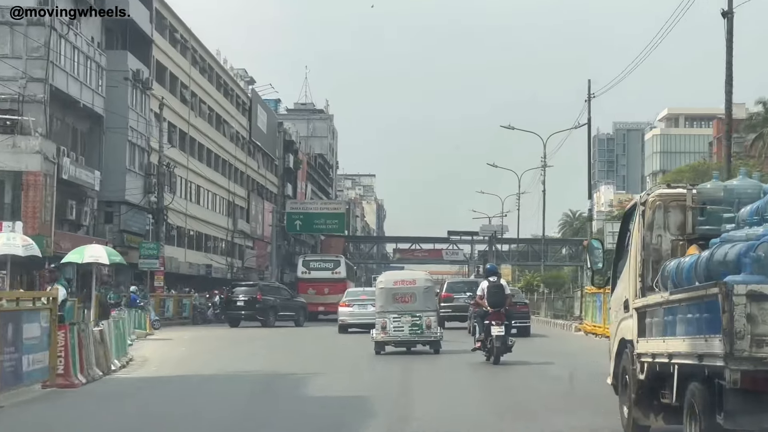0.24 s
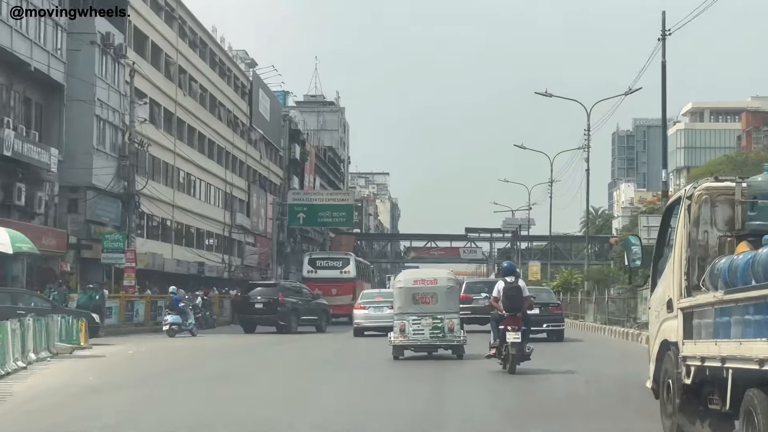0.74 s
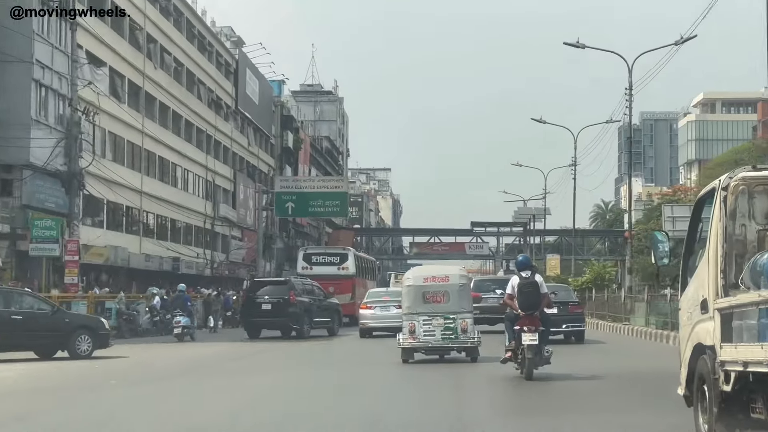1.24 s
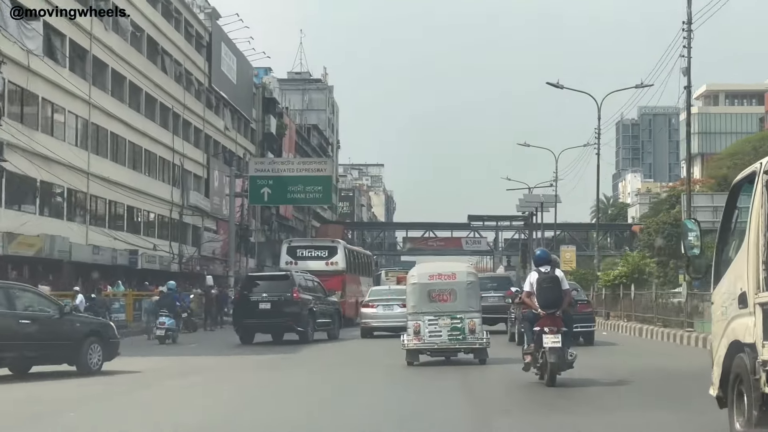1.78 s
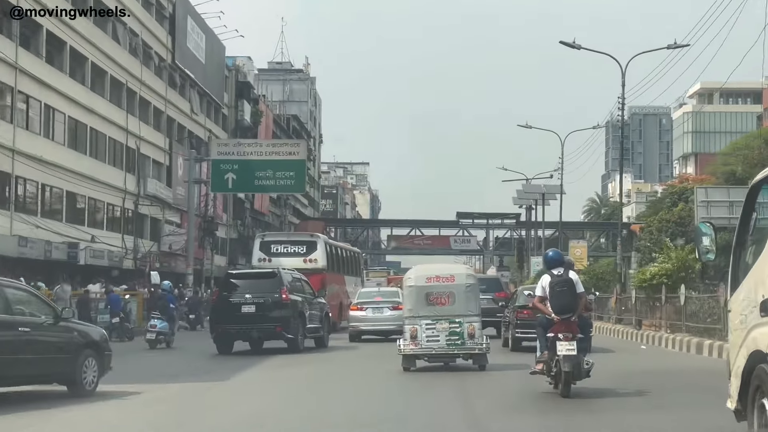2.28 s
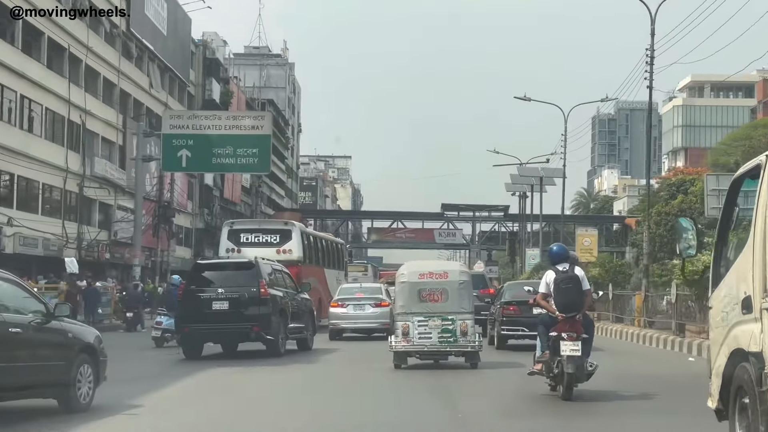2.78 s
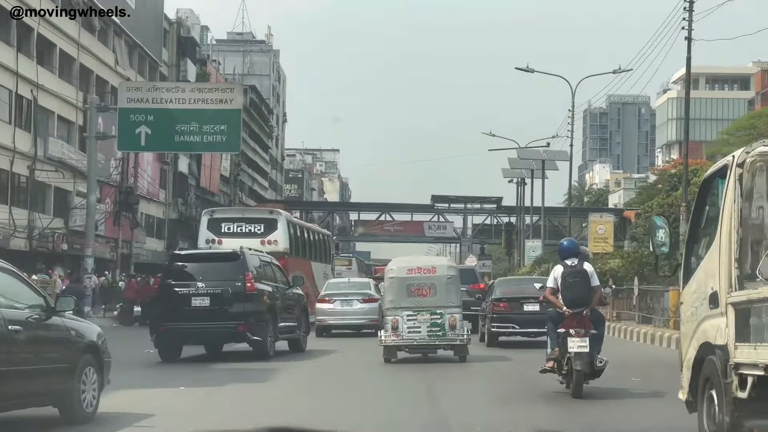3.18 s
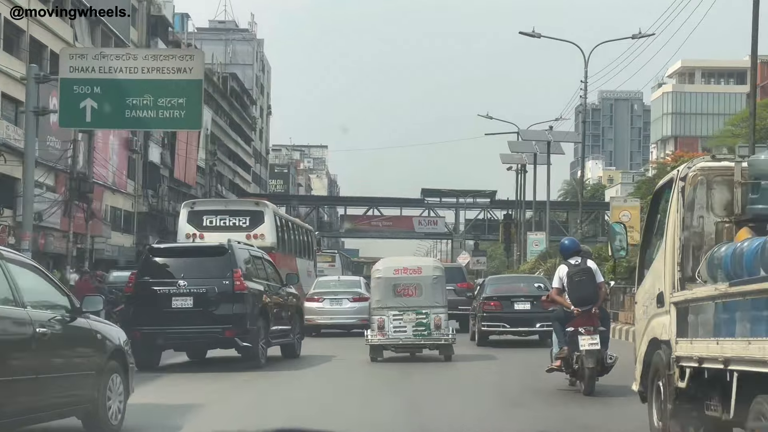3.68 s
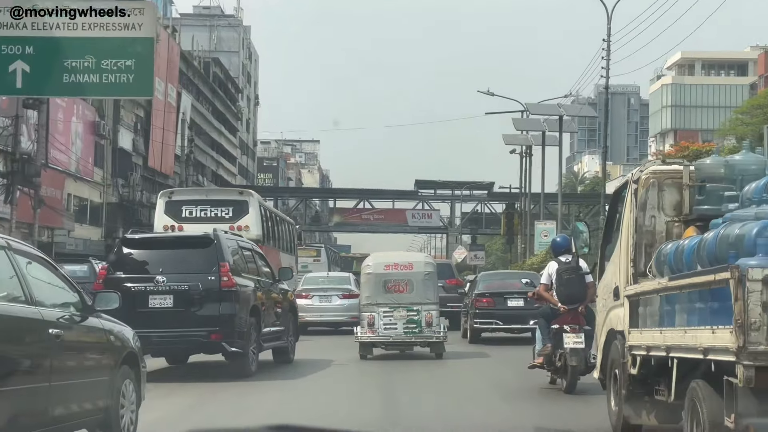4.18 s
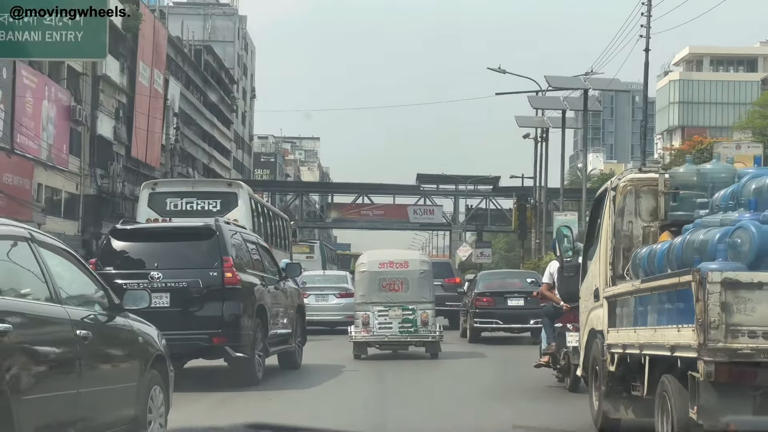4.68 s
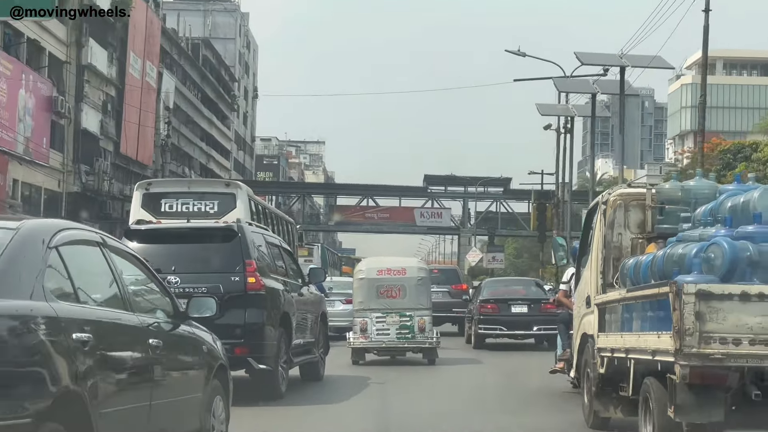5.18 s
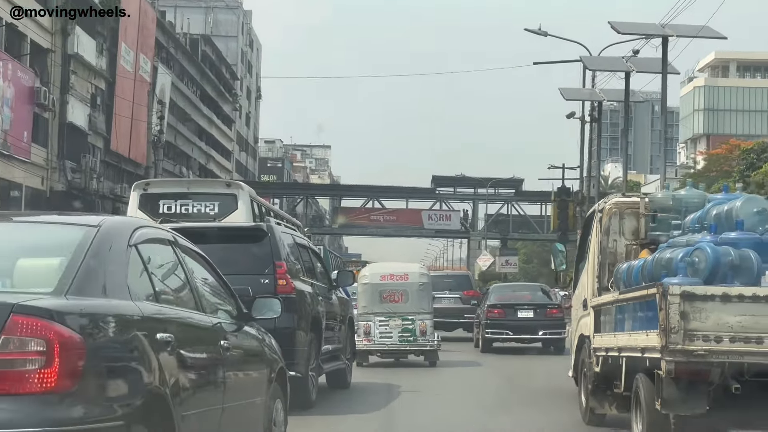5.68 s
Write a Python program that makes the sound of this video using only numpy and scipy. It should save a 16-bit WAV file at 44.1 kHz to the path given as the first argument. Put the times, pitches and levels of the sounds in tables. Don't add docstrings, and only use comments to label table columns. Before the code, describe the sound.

Strong wind buffets a microphone with heavy low thumps and pops, easing to a softer rumble, over faint fan hiss and barely audible distant horns.

```python
import sys
import numpy as np
from scipy import signal
from scipy.fft import rfft, irfft
from scipy.io import wavfile
from scipy.ndimage import uniform_filter1d, minimum_filter1d

SR = 44100
rng = np.random.default_rng(int(sys.argv[2]) if len(sys.argv) > 2 else 0)


def linear_from_db(decibels):
    return 10 ** (np.asarray(decibels, float) / 20)


def waveform_to_disk(signal):
    frames = np.transpose(np.atleast_2d(signal))
    scaled = np.clip(frames, -1, 1) * 32767
    samples = np.round(scaled).astype(np.int16)
    wavfile.write(sys.argv[1], SR, samples)


N = 261954

# time in seconds, strength in dB.
FLOW_DB = [(0, -24.5), (.38, -24), (.66, -25.5), (1.1, -25.5), (1.4, -23.5), (1.65, -23.5), (1.85, -25.5),
           (2.0, -22.5), (2.25, -35.5), (2.45, -27.5), (2.8, -31), (3.44, -34), (3.68, -34), (4.3, -32.5),
           (5.09, -36.5), (5.5, -34), (5.72, -44.5), (5.94, -36.5)]
USUAL_FLOW_DB = -30
# frequency in Hz, level in dB per Hz.
RUMBLE_DB = [(20, -54), (45, -5), (80, 1), (96, 10.5), (125, -3), (170, -29.5), (400, -110)]


def evened(x):
    return x / np.sqrt(np.mean(x ** 2) + 1e-20)


def read(points, hz, axis=1):
    columns = np.transpose(points)
    return np.interp(np.log(hz + 1), np.log(columns[0] + 1), columns[axis])


def coloured(x, points):
    hz = np.fft.rfftfreq(x.shape[-1], 1 / SR)
    return irfft(rfft(x) * linear_from_db(read(points, hz)), x.shape[-1])


def add(mix, start_s, sound):
    part = mix[..., max(round(start_s * SR), 0):][..., :sound.shape[-1]]
    part += sound[..., :part.shape[-1]]


def wobble(hz):
    return evened(coloured(rng.standard_normal(N), [(0, -90), (2, 0), (hz, -3), (3 * hz, -40), (9 * hz, -120)]))


def flow_change_db(t_s):
    return np.interp(t_s, *np.transpose(FLOW_DB)) - USUAL_FLOW_DB


def burst(noise, shape, length_s, late_s=0):
    u = np.maximum(np.arange(len(noise)) / SR - late_s, 0) / length_s
    x = coloured(noise, shape) * u ** 2.96 * np.exp(-7.5 * u)
    return x / abs(x).max()


def stream():
    # frequency in Hz, level in dB per Hz.
    roar_db = [(50, -54), (110, -6.5), (150, -2.5), (220, -7), (300, -10), (420, -37), (900, -110)]
    flutter_db = [(100, -51.5), (250, -7.5), (330, -2.5), (500, -5), (800, -17.5), (1200, -50),
                  (2500, -110)]
    # level at the usual flow in dB, rise in dB per dB of flow.
    follow = [(-33, 0.76), (-29, 1.07), (-38, 0.75)]
    change_db = flow_change_db(np.arange(N) / SR)
    gust = wobble(13.2)
    rumble = evened(coloured(rng.standard_normal(N), RUMBLE_DB) * linear_from_db(0.83 * gust))
    roar = evened(coloured(rng.standard_normal(N), roar_db) * linear_from_db(3.15 * gust + 1.2 * wobble(30)))
    flutter = evened(coloured(rng.standard_normal(N), flutter_db) * linear_from_db(4.2 * gust + 3.36 * wobble(64)))
    out = np.zeros(N)
    for noise, (usual_db, share) in zip((rumble, roar, flutter), follow):
        out += noise * linear_from_db(usual_db + share * change_db)
    return out


def pops():
    # time in seconds, peak in dB, sharp edge in dB.
    snap_rows = [(.251, -16.5, -22), (.758, -12, -13.5), (1.587, -16, -27), (2.18, -19.5, -12),
                 (2.245, -18, -11.5), (2.439, -12.5, -9.5), (2.77, -24, 7), (2.94, -17.5, -21),
                 (3.049, -21, -17), (3.177, -20, -10), (3.252, -14, -18), (3.376, -18, -14),
                 (3.42, -17, -3), (3.634, -19, -14), (3.78, -18, -9.5), (3.853, -18, -10),
                 (4.441, -18, -28), (4.517, -17, -11), (4.589, -16.5, -4), (4.666, -28.5, -2),
                 (4.713, -21, -11), (5.323, -22, -9), (5.42, -22.5, -12), (5.524, -23.5, -23),
                 (.05, -26, -14), (1.534, -23.5, -28), (2.565, -14, -6), (4.785, -23, -9),
                 (5.164, -25, -11), (5.616, -29, -22)]
    knock_rows = [(0.077, -19, -13), (.194, -3, -8.5), (.376, -8, -28), (0.391, -10.5, -20),
                  (.576, -11, -36), (0.635, -18, -28), (.906, -7, -22), (1.523, -13.5, -30),
                  (1.637, -10.5, -40), (1.701, -6, -39), (1.78, -9.5, -12), (1.92, -13.5, -17),
                  (1.964, -5.5, -11), (1.994, -9.5, 0.5), (2.1, -14, -2), (2.397, -11.5, -4),
                  (2.579, -19.5, -5.5), (2.593, -11, -38), (2.683, -7.5, -39), (2.917, -18.5, -18),
                  (2.995, -21.5, -11), (3.104, -18.5, -23), (3.295, -19, -15), (3.479, -18.5, -9),
                  (3.531, -19, -14), (4.089, -21, -12), (4.757, -18.5, 2.5), (4.844, -20, -5),
                  (5.375, -21.5, -32), (5.464, -18, 5.5)]
    shove_rows = [(0.419, -14, -24), (0.498, -29, -26), (0.551, -22.5, -25), (.74, -14, -18),
                  (.88, -13.5, -27), (0.999, -18.5, -15), (1.114, -24.5, -19), (1.217, -22, -25),
                  (1.294, -10.5, -20), (1.401, -19, -27), (1.439, -17.5, -29), (1.456, -18, -29),
                  (1.74, -13, -24), (1.901, -24, -21), (2.031, -14.5, -13), (2.538, -16, -13.5),
                  (2.637, -26.5, -25), (2.718, -20.5, -8.5), (2.886, -27.5, -10), (3.578, -20.5, -1),
                  (3.975, -29, 1.5), (4.219, -23, -15), (4.253, -23.5, -3), (4.38, -24.5, -25),
                  (4.396, -22, -29), (4.956, -31, 2), (5.565, -23.5, -4.5), (5.81, -30.5, -26),
                  (5.879, -32, -24)]
    # low push in dB, length in ms.
    sizes = [(-7, 15.5), (1, 15.36), (8, 16.1)]
    # frequency in Hz, level in dB per Hz.
    body_db = [(80, -66), (200, 3), (330, 13.5), (550, 6), (800, -14.5), (1100, -64), (2500, -110)]
    sharp_db = [(200, -75), (500, -3), (750, 11), (1000, -6.5), (1300, -17), (1700, -53), (3000, -110)]
    shove_db = [(30, -66.5), (70, -41), (130, 21), (220, 18), (330, 10.5), (500, -36), (1200, -110)]
    out = np.zeros(N)
    for rows, (push_db, ms) in zip((snap_rows, knock_rows, shove_rows), sizes):
        for (s, db, edge_db), noise in zip(rows, rng.standard_normal((30, 3, 4096))):
            length_s = ms / 1000 * np.exp(0.16 * noise[0, 0])
            body = burst(noise[0], body_db, 1.18 * length_s)
            edge = burst(noise[1], sharp_db, 0.52 * length_s, 0.27 * length_s)
            push = burst(noise[2], shove_db, 2.22 * length_s)
            pop = body + linear_from_db(edge_db) * edge + linear_from_db(push_db - 2.5) * push
            add(out, s - .005, linear_from_db(db) * pop)
    return out


def thumps():
    # middle in seconds, peak in dB, length in ms.
    slow_eddies = [(0.096, -22.5, 90), (0.206, -8, 52), (0.311, -13.5, 99), (0.404, -14, 86),
                   (0.494, -18, 55), (.656, -12, 46.5), (0.764, -17.5, 54), (.887, -22, 150),
                   (1.049, -19, 120), (1.186, -22, 45), (1.27, -9.5, 110), (1.414, -13.5, 68),
                   (1.552, -12, 58), (1.617, -12, 60), (1.742, -26, 60), (1.797, -13.5, 55),
                   (1.975, -15.5, 150), (2.185, -14.5, 66), (2.373, -8, 125), (2.555, -15.5, 44),
                   (2.787, -27, 60), (2.893, -27.5, 60), (3.161, -22.5, 75), (3.269, -25, 52),
                   (3.593, -17, 65), (3.794, -21, 85), (4.166, -17, 75), (4.394, -24, 90), (5.244, -19, 38),
                   (5.887, -23, 47)]
    out = np.zeros(N)
    for s, db, ms in slow_eddies:
        length_s = np.clip(ms, 20, 160) / 1000
        add(out, s - .42 * length_s, linear_from_db(db) * burst(rng.standard_normal(16384), RUMBLE_DB, length_s))
    return out


def hiss():
    # frequency in Hz, level in dB per Hz.
    hiss_db = [(200, -9.5), (500, -8.5), (930, -11.5), (1300, -15), (2260, -20), (2700, -21), (3860, -26.5),
               (5000, -34), (6600, -38.5), (9000, -40), (11000, -38), (13000, -41), (15740, -43),
               (15800, -91.5)]
    # time in seconds, level in dB.
    slow_level = [(0, -54), (.4, -55), (1.5, -55.5), (2.5, -56), (3.5, -55.5), (4.5, -56), (5.2, -56.5),
                  (5.94, -57)]
    # frequency in Hz, width in Hz, height in dB.
    duct = [(1122, 210, 4.5), (1498, 99, 5.5), (2437, 39, 11), (3000, 83, 4), (3790, 140, 1)]
    frame_count, hz = N // 256 + 5, np.fft.rfftfreq(1024, 1 / SR)
    t_s = np.arange(frame_count) * 256 / SR
    a, b, c, d, patches = rng.standard_normal((frame_count, 513, 5)).T
    patches = evened(uniform_filter1d(uniform_filter1d(patches, 10, 0), 12, 1))
    shape_db = read(hiss_db, hz)
    for f, width_hz, peak_db in duct:
        shape_db = shape_db + peak_db / (1 + (2 * (hz - f) / width_hz) ** 4)
    s, db = np.transpose(slow_level)
    drift_db = np.interp(t_s, s, db - db.mean())
    stirred = 0.29 / (1 + (hz / 950) ** 4)
    street = 1 / (1 + (hz / 4500) ** 4)
    moving_db = np.outer(street, drift_db) + np.outer(stirred, flow_change_db(t_s))
    z = np.array([a + 1j * b, c + 1j * d]) * linear_from_db(shape_db[:, None] + 0.52 * patches + moving_db)
    noise = signal.istft(z, nperseg=1024, noverlap=768)[1][:, :N]
    return evened(noise) * linear_from_db(db.mean() + 13.5)


def horns():
    # start in seconds, end in seconds, strongest partial in dB,
    # fall in dB per partial below it, fall in dB per partial above it.
    honks = [(.648, .668, -67, 25, 22), (0.708, .747, -60, 26, 6), (2.424, 2.52, -82, 15, 12),
             (2.734, 2.9, -80, 23, 14), (2.88, 2.98, -80, 19, 13), (3.265, 3.34, -75, 17, 17),
             (3.218, 3.605, -73.5, 1, 7), (3.38, 3.532, -73, 19, 10), (3.62, 3.76, -79, 12, 12),
             (5.39, 5.47, -78, 8, 11)]
    # pitch in Hz, number of the strongest partial.
    reeds = [(733, 6), (757.5, 6), (306.8, 20), (306.8, 20), (599, 10), (597.6, 10), (597.6, 8), (539, 9),
             (572, 9), (610, 10)]
    out = np.zeros(N)
    offset = np.arange(-1, 3)
    for (start_s, end_s, db, below_db, above_db), (hz, top) in zip(honks, reeds):
        t, k = np.arange(0, end_s - start_s, 1 / SR), top + offset[:, None]
        partials_db = db + 8 - abs(offset) * np.where(offset < 0, below_db, above_db)
        tone = linear_from_db(partials_db) @ np.sin(2 * np.pi * (k * hz * t + rng.random(k.shape)))
        add(out, start_s, tone * signal.windows.tukey(len(t), min(0.015 / (end_s - start_s), 1)))
    return out


def whine():
    return linear_from_db(-85) * np.sin(2 * np.pi * 5846 * np.arange(N) / SR)


def tones():
    return (horns() + whine()) * linear_from_db(1.8 * wobble(90))


def ticks():
    # time in seconds, peak in dB.
    trim = [(0.2464, -48), (0.6534, -47), (1.4844, -54), (3.6287, -51)]
    bright_db = [(2000, -28), (7000, -9), (12000, 7), (15700, 5.5), (15800, -80)]
    out = np.zeros(N)
    for s, db in trim:
        add(out, s - .001, linear_from_db(db + 2.0) * burst(rng.standard_normal(1024), bright_db, 0.0047))
    return out


def ports(air, stray):
    # frequency in Hz, likeness 0-1, lag of the right in radians, left over right in dB.
    port_pair = [(60, .995, .1, .1), (170, .98, .2, .3), (860, .94, .19, 0), (1500, .67, -.1, -.7),
                 (2240, .12, -2, -3.5), (2900, .3, -4.6, -5.4), (3600, .8, -5.9, -.8),
                 (5300, .87, -5.65, 0), (7400, 1, -6.27, 0), (9300, 1, -6.27, 0), (11600, .97, -5.7, 0),
                 (12650, 1, -3.14, 0), (13600, .97, -.6, 0), (14100, .98, -.06, 0), (15700, .8, -.5, 0)]
    hz = np.fft.rfftfreq(N, 1 / SR)
    same = np.clip(read(port_pair, hz), 0, 1)
    lag_rad = read(port_pair, hz, axis=2)
    tilt = linear_from_db(read(port_pair, hz, axis=3) / 2)
    left = rfft(air)
    right = same * np.exp(-1j * lag_rad) * left + np.sqrt(1 - same ** 2) * rfft(stray)
    return irfft(np.array([left * tilt, right / tilt]), N)


def scene():
    air, other, fan = stream() + pops(), stream() + pops(), hiss()
    return ports(air + thumps() + fan[0] + tones() + ticks(), 1.17 * other + fan[1])


def band_limit(x):
    return signal.sosfilt(signal.butter(12, 15770, fs=SR, output="sos"), x)


def record(dry):
    thin = signal.sosfilt(signal.butter(4, 43, "high", fs=SR, output="sos"), dry)
    peak = -minimum_filter1d(-abs(thin).max(0), size=800)
    held = thin * uniform_filter1d(np.minimum(.8 / peak, 1), size=800)
    return band_limit(held)


dry = scene()
out = record(dry)
waveform_to_disk(out)
```